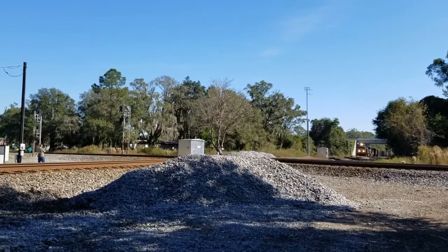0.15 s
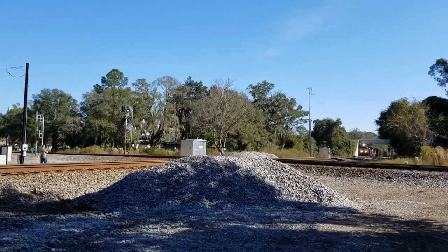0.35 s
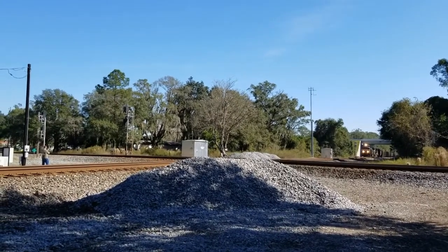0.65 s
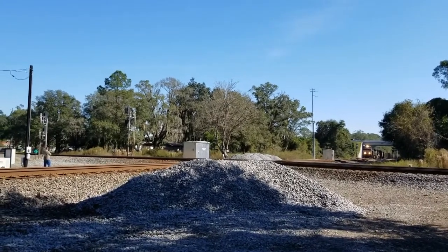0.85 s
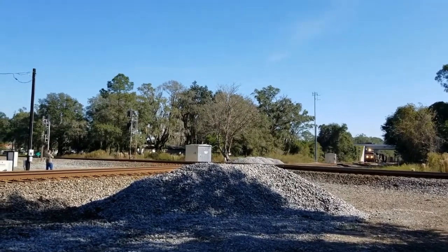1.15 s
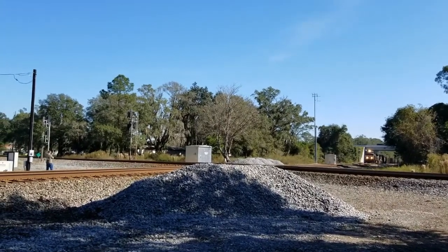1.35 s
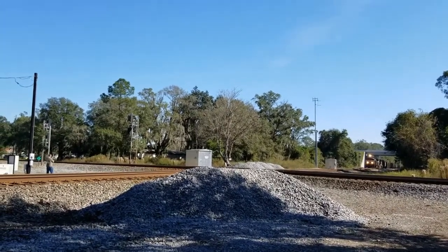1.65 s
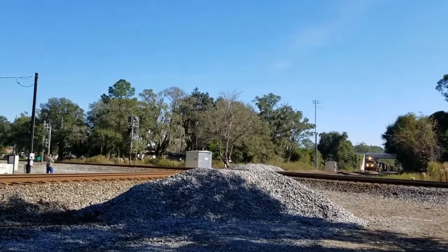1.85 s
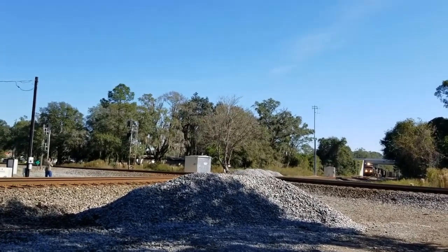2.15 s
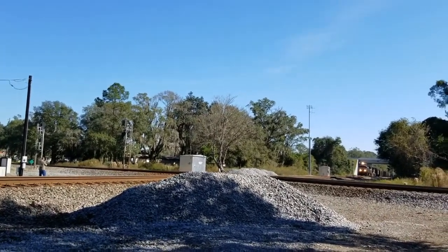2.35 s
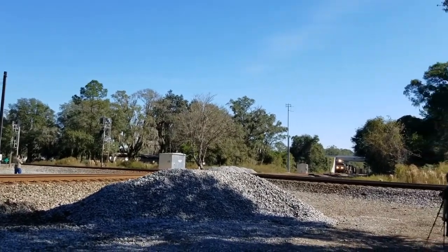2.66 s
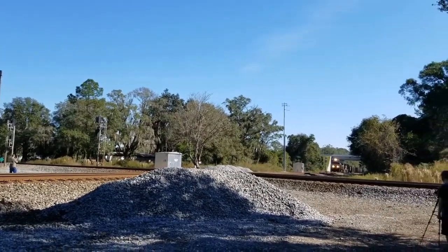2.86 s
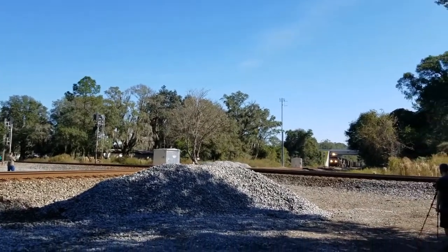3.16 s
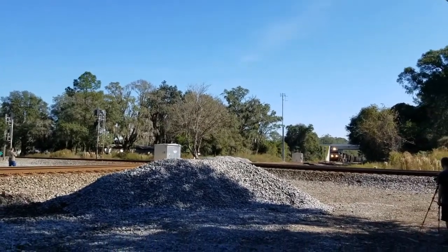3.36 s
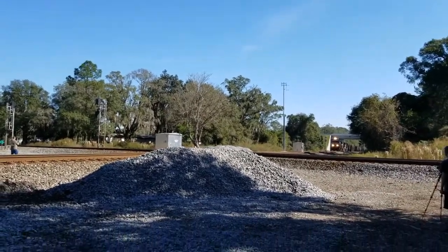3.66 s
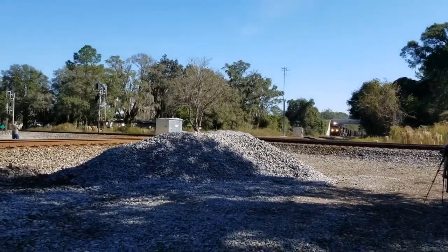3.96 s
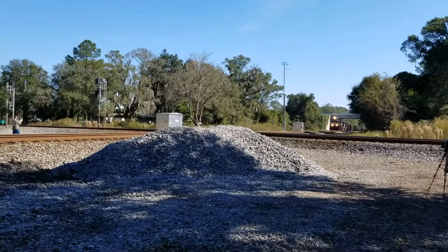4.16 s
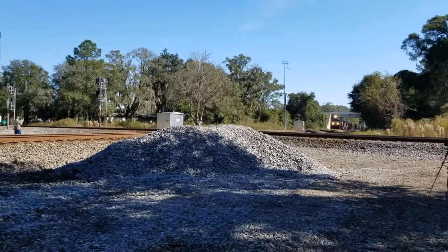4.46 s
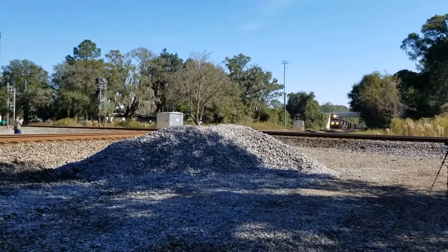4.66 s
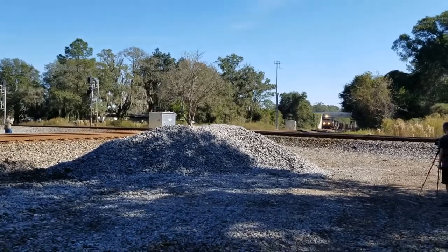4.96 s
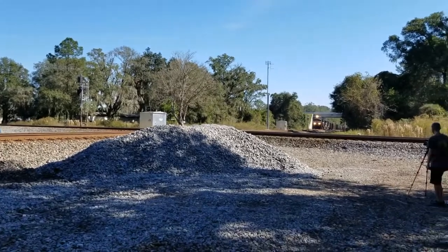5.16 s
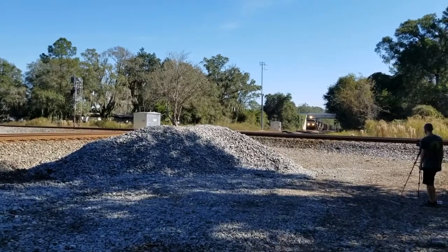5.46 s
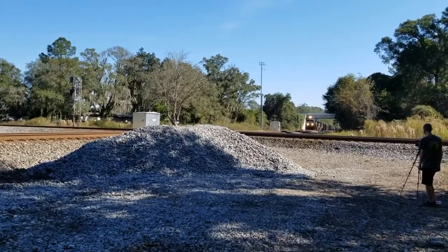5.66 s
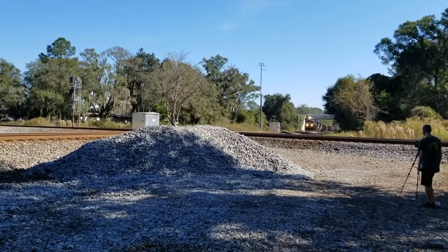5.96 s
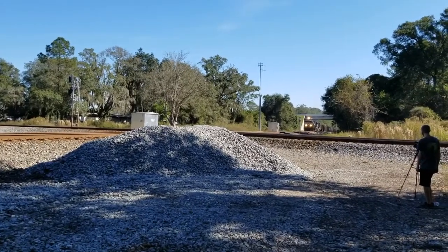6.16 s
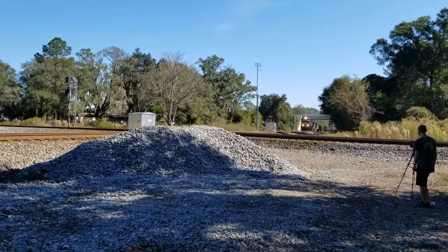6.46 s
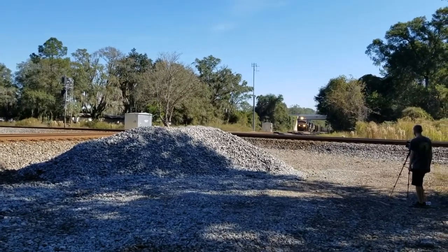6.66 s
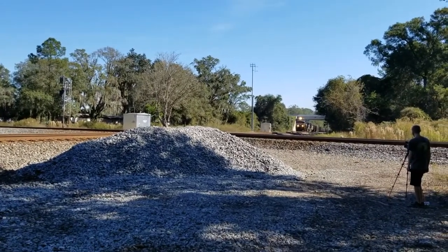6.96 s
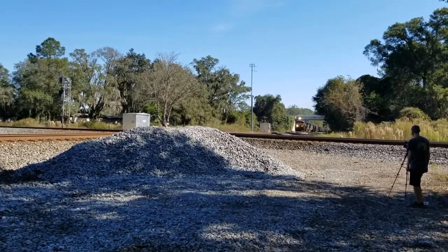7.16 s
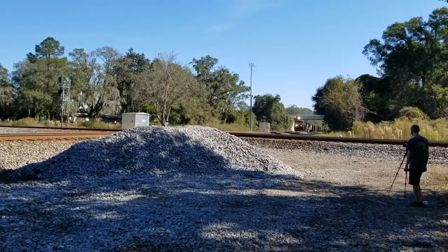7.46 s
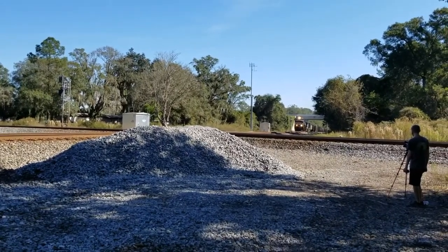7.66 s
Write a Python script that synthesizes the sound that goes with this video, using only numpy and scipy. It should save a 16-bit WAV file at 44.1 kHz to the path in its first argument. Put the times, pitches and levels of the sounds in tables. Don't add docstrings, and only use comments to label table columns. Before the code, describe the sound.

Distant diesel freight train throbs and revs up while gravel crunches close by, air hisses out, then a loud multi-note horn blares to the end.

```python
import sys
import numpy as np
from scipy import signal
from scipy.fft import rfft, irfft, next_fast_len
from scipy.io import wavfile
from scipy.ndimage import uniform_filter1d

SR = 44100
rng = np.random.default_rng(int(sys.argv[2]) if len(sys.argv) > 2 else 0)


def elevation(decibels):
    levels = np.asarray(decibels, float)
    return 10 ** (levels / 20)


def int16_out(signal):
    q = np.round(np.clip(np.atleast_2d(signal).T, -1, 1) * 32767)
    wavfile.write(sys.argv[1], SR, q.astype(np.int16))


N = 344862

# multiple of the crank cycle, level/dB rms
LEAD_ORDERS = [(6, -48.5), (9, -37.5), (10, -53.5), (11, -34.5), (12, -28), (13, -50), (14, -47), (15, -38),
               (17, -54), (18, -54.5), (20, -56.5), (21, -50), (22, -58.5), (23, -58), (24, -44.5),
               (25, -50.5), (26, -55), (27, -54.5), (28, -51.5), (29, -52), (30, -51), (31, -52.5),
               (32, -54), (33, -49.5), (34, -58.5), (36, -55.5)]
# f/Hz, level/dB rms
TRAIL_TONES = [(41.6, -47), (50.1, -45), (91.9, -36), (100.1, -47.5), (107.2, -49.5), (126.3, -58.5),
               (163.9, -52.5)]


def engines():
    idle_cps, full_cps = 5.875, 6.76
    t = np.arange(0, N + 64, 8) / SR
    revs = s_curve(t, mid=4.52, pace=.88)
    cycles = idle_cps + (full_cps - idle_cps) * revs
    load_db = 1.5 - 5.5 * np.exp(-t / 0.39) - 7.5 * revs ** 2
    shut_db, open_db, growth_db_per_s = -17.5, -3.5, 0.94
    bark_db = shut_db + (open_db - shut_db) * s_curve(t, mid=1.6, pace=0.31) + growth_db_per_s * t
    swell_period_s, swell_top_s = 2.6, 0.045
    swell_db = 3 * np.cos(2 * np.pi * (t - swell_top_s) / swell_period_s)
    trail_db = 0.5 - 0.55 * t + swell_db

    crank = np.cumsum(cycles) * t[1]
    turns = [(k * crank, db + load_db + bark_db * (k > 19.5)) for k, db in LEAD_ORDERS]
    turns += [(hz * t, db + trail_db) for hz, db in TRAIL_TONES]
    waver = wander(1.496, t, count=len(turns))
    slip = wander(2.8, t, count=len(turns))
    out = np.zeros(len(t))
    for (turn, db), w, p in zip(turns, waver, slip):
        phase = 2 * np.pi * (turn + rng.random()) + 0.2 * p
        out += elevation(db + 1.85 * w) * np.cos(phase)
    return ports(np.sqrt(2) * signal.resample_poly(out, 8, 1)[:N])


# delay t/s, pitch factor, level/dB
ECHOES = [
    (.2, .9805, -12),
    (.1, .992, -15),
    (.33, .971, -19),
]
# f/Hz, level/dB per Hz
RASP = [(220, -42.5), (330, -26), (430, -36.5), (750, -18.5), (1000, 3), (1300, -20), (2000, -9),
        (3400, -27.5), (4500, -46), (6500, -32.5), (8800, -29), (10500, -38.5), (13000, -60)]


def horn():
    at = round(6.45 * SR)
    t = np.arange(at, N) / SR
    direct = chord(t, shimmer_db=1.91, blur=0.46, bend=1.43)
    echo = np.zeros_like(direct)
    for late, flat, db in ECHOES:
        heard_at = (t - t[0] - late) * flat
        echo += elevation(db) * np.array([np.interp(heard_at, t - t[0], x) for x in direct[::-1]])
    rasp = noise(lambda hz, s: read(RASP, hz) - 46.5 + 0 * s, patchy_db=2.0, size=len(t))
    swell = elevation(pressure_db(t)) * (1 - np.exp(-np.maximum(t - 6.54, 0) / 0.06))
    far = direct + echo
    heard = ports(far + elevation(-11.5) * scatter(far, t60=0.74)) + rasp * swell
    return np.pad(heard, ((0, 0), (at, 0)))


# speaks at t/s, settled f/Hz, share sharp at first, sag share per s, first blare level/dB
CHIMES = [
    (6.528, 271.2, .06, 0.00099, 1.5),
    (6.536, 322.6, .03, .0029, 6),
    (6.532, 376.5, .028, 0.00097, -5),
    (6.54, 485.4, .025, 0.00052, 1.5),
    (6.55, 520.2, .025, 0.00202, -5.5),
]
VOICES = [
    [-26.5, -46.5, -30.5, -30.5, -36.5, -40, -33, -42, -43.5, -41],
    [-35, -31, -34, -39, -40, -38, -48, -49, -56.5, -54.5],
    [-27, -22.5, -45, -38.5, -33.5, -48, -43.5, -64.5, -47, -59.5],
    [-39, -28.5, -40, -38, -42.5, -45.5, -41, -58, -50, -58],
    [-38.5, -41, -36, -41.5, -49.5, -53, -47, -50, -61.5, -55.5],
]


def chord(t, shimmer_db, blur, bend):
    settle_s = .36
    out = np.zeros((2, len(t)))
    for (start, hz, sharp, sag, blare_db), voice in zip(CHIMES, VOICES):
        age = np.maximum(t - start, 0)
        sharpness = sharp * np.exp(-(age * sharp * 100 / settle_s) ** 1.55)
        turns = np.cumsum(hz * (1 + sharpness - sag * (age - .6))) / SR
        blare = blare_db * np.exp(-age / 0.16)
        levels = list(voice) + [voice[-1] - .012 * hz * k for k in range(1, 7)]
        for k, db in enumerate(levels, 1):
            apart = min((k * hz / 2000) ** 1.4, 2.2)
            both, slip, *each = wander(min(4.0 + 18 * apart ** 2, 90), t - t[0], count=4)
            rise_s = 0.011 + 0.001 * k * (hz / 270) ** 3
            rise = (1 - np.exp(-age / rise_s)) ** (1.5 + .4 * k)
            gain = elevation(db + blare + shimmer_db * (both + apart * np.array(each)))
            jitter = blur * apart * (slip + 0.7 * np.array(each[::-1]))
            phase = 2 * np.pi * (k * turns + rng.random()) + jitter
            out += np.sqrt(2) * rise * gain * np.cos(phase)
    out += bend * signal.lfilter(*signal.butter(3, 800, "high", fs=SR), out ** 2)
    return out * elevation(pressure_db(t))


def pressure_db(t):
    age = np.maximum(t - 6.525, 0)
    return 8.5 - 13 * np.exp(-age / 0.01) - 7.5 * np.exp(-age / 0.19)


def scatter(x, t60):
    t = np.arange(SR) / SR
    tail = rng.standard_normal((SR, 2)).T * elevation(-60 * t / t60) * (t > .015)
    return signal.fftconvolve(x, tail / np.linalg.norm(tail[0]), axes=1)[:, :x.shape[1]]


# f/Hz, level/dB per Hz
VENT = [(530, -35.5), (900, -3.5), (1360, -12.5), (1760, 0), (2150, -6.5), (2480, -0.5), (2820, -7.5),
        (4060, -4), (7150, -26.5), (8630, -22), (15000, -50)]


def vent():
    valve_s, rise_s, burst_db, burst_s = 4.775, 0.024, 11.5, 0.23
    leak_db, leak_db_per_s = -59, 3

    def level_db(hz, s):
        age = np.maximum(s - valve_s, 0)
        opened = 20 * np.log10(s_curve(s, valve_s, rise_s) + 1e-3)
        burst = burst_db * np.exp(-age / burst_s)
        return read(VENT, hz) + opened + burst + leak_db + leak_db_per_s * age
    return noise(level_db, patchy_db=0.5)


# start t/s, end t/s, f/Hz, width f/Hz, level/dB rms
WHINES = [(0, 4.7, 7270, 80, -78.5), (2.0, 2.6, 4875, 200, -64), (2.4, 7.0, 8765, 70, -80),
          (4.9, 7.0, 8360, 60, -80), (3.7, 5.2, 1765, 50, -54), (5.24, 5.5, 1820, 8, -41),
          (5.4, 7.0, 1818, 30, -44.5), (5.5, 7.0, 850, 10, -48.5), (4.75, 6.6, 3990, 22, -51.5),
          (4.9, 6.2, 5715, 30, -62), (4.9, 6.4, 5080, 80, -62), (2.7, 3.9, 3200, 250, -56),
          (5.7, 6.5, 1523, 25, -53)]


def whines():
    turbo_hz, spool_hz_per_s, spooled_s = 8765, 325, 4.9
    out = np.zeros((2, N))
    for start, end, hz, width, db in WHINES:
        at, t = span(start, end)
        lag = spool_hz_per_s * np.maximum(spooled_s - t, 0) * (hz == turbo_hz)
        out[:, at:at + len(t)] += elevation(db) * whistle(hz - lag, width, core=1.1)
    return ports(out)


# start t/s, end t/s, f/Hz, width f/Hz, level/dB rms
SQUEALS = [
    (1.27, 1.54, 3812, 12, -49),
    (1.45, 1.98, 3792, 60, -58),
    (1.2, 1.44, 3085, 40, -59),
    (1.2, 1.33, 3800, 30, -58),
]


def squeals():
    chatter_per_s, chatter_top_s = 18, 1.375
    out = np.zeros((2, N))
    for start, end, hz, width, db in SQUEALS:
        at, t = span(start, end)
        chatter = 1 + .75 * np.cos(2 * np.pi * chatter_per_s * (t - chatter_top_s))
        out[:, at:at + len(t)] += elevation(db) * whistle(hz + 0 * t, width, core=3, swing=chatter)
    return ports(out)


def span(start, end):
    return round(start * SR), np.linspace(start, end, round((end - start) * SR))


def whistle(hz, width, core, swing=1):
    size = len(hz)
    r = np.exp(-np.pi * width / SR)
    fuzz = signal.lfilter([1], [1, -2 * r, r * r], rng.standard_normal((4, size)))
    fuzz = fuzz[:2] + 1j * fuzz[2:]
    fuzz = evened(abs(fuzz)) * np.exp(1j * np.angle(fuzz))
    tone = swing * np.exp(2j * np.pi * np.cumsum(hz) / SR)
    return evened(((fuzz + core) * tone).real) * signal.windows.tukey(size, .4)


# t/s, peak level/dB, lowest f/Hz, highest f/Hz
TICKS = [(.4284, -39, 2500, 5500), (.5736, -27, 3000, 7000), (.5736, -36, 12500, 17000),
         (.7736, -36, 11500, 17000), (1.1615, -23, 2000, 3100), (1.1615, -32, 3500, 8500),
         (3.6316, -50, 5000, 13000), (3.7, -48, 7000, 15000), (7.76, -33, 11500, 17000),
         (4.0115, -28, 700, 2600), (1.2325, -26, 600, 2500)]
# t/s, thump level/dB, thump f/Hz, grit level/dB, length t/s
STEPS = [
    (0.242, -30, 420, -46.5, .03),
    (0.683, -31, 605, -40.5, .015),
    (1.231, -25, 400, -43.5, .03),
    (1.527, -16.5, 433, -35, .049),
    (3.45, -31, 1300, -37, .04),
    (4.01, -21.5, 1190, -44, 0.011),
    (4.41, -24, 1090, -52, .017),
]


def gravel():
    out, t = np.zeros((2, N + 8192)), np.arange(4096) / SR
    tick_pan_db = np.array([[2.5], [-2.5]])
    for s, db, lo_hz, hi_hz in TICKS:
        burst = rng.standard_normal((4096, 3)).T * np.exp(-t / 0.00038)
        band = signal.butter(2, [lo_hz, hi_hz], "band", fs=SR)
        burst = signal.lfilter(*band, burst[0] + burst[1:])
        burst = signal.lfilter([1], [1, -.55], burst)
        out[:, round(s * SR):][:, :4096] += elevation(db + tick_pan_db) * burst / abs(burst).max()
    for s, db, hz, grit_db, length in STEPS:
        top_hz = 9000 if hz < 520 else 2300
        thump = elevation(db) * np.exp(-t * hz / 0.98) * np.sin(2 * np.pi * hz * t - 1.2)
        thump = uniform_filter1d(uniform_filter1d(np.roll(thump, 12), size=9), size=9)
        clumps_db = 2.7 * np.repeat(rng.standard_normal(64), 64)
        grains = rng.standard_normal((4096, 2)).T * elevation(clumps_db)
        dull = signal.lfilter([.15], [1, -.85], grains)
        grit = signal.lfilter(*signal.butter(2, top_hz, fs=SR), evened(dull))
        spray = (1 + 1.6 * np.exp(-t / 0.004)) * np.exp(-(t / length) ** 3)
        step = thump + elevation(grit_db) * grit * spray
        out[:, round(s * SR):][:, :4096] += elevation([[1.2], [-1.2]]) * step
    shade = signal.lfilter(*signal.butter(1, [8800, 11500], "bandstop", fs=SR), out[:, :N])
    return 0.5 * shade + 0.43 * out[:, :N]


# f/Hz, level/dB per Hz
ROAR = [(20, -38.5), (45, -10.5), (90, -11), (130, -21), (210, -24.5), (300, -27), (420, -38.5),
        (700, -32.5), (1160, -37), (3080, -41), (4250, -49), (5500, -53), (7000, -66), (10400, -75),
        (16000, -74.5)]


def roar():
    open_s, nearing_db = 3.84, 1.5
    dull_db, bright_db = 0.04, 1.5

    def level_db(hz, s):
        near = np.minimum(s / open_s, 1)
        bright = dull_db + (bright_db - dull_db) * near
        octaves = np.log2(np.maximum(hz, 1000) / 1000)
        return read(ROAR, hz) - 26 + nearing_db * near + bright * octaves
    return noise(level_db, patchy_db=1.54)


def rustle():
    t = np.arange(N) / SR
    high = signal.butter(2, 11500, "high", fs=SR, output="sos")
    fizz = signal.sosfilt(high, rng.standard_normal((N, 2)).T)
    moving_db = 15 * s_curve(-t, -1.9, .3) + 12 * s_curve(t, 7.66, .06)
    return elevation(-79.5 + moving_db + 2.5 * wander(5.0, t, count=1)) * fizz


# f/Hz, width f/Hz, level/dB
RIDGES = [(740, 430, 1), (1825, 685, 6), (3380, 550, 3), (4900, 800, 4), (7300, 260, 1.5), (4540, 240, -2)]
# f/Hz, likeness 0..1
SAME = [(100, .98), (200, .97), (500, .8), (860, .76), (1250, .45), (1800, .45), (2300, .2), (3400, .5),
        (5000, .4), (6500, .15), (9000, .05)]


def noise(level_db, patchy_db, size=N):
    frames, hz = size // 256 + 5, np.fft.rfftfreq(1024, 1 / SR)
    a, b, c, d, patches = rng.standard_normal((frames, 513, 5)).T
    patches = uniform_filter1d(uniform_filter1d(patches, size=7, axis=0), size=40, axis=1)
    ridges = sum(db / (1 + (2 * (hz - f) / w) ** 2) for f, w, db in RIDGES)
    same = np.clip(read(SAME, hz), 0, 1)[:, None]
    left = a + 1j * b
    right = same * left + np.sqrt(1 - same ** 2) * (c + 1j * d)
    shape_db = level_db(hz[:, None], np.arange(frames) * 256 / SR) + ridges[:, None]
    z = np.array([left, right]) * elevation(shape_db + patchy_db * evened(patches))
    return ports(signal.istft(z, nperseg=1024, noverlap=768)[1][:, :size])


# f/Hz, radians the left leads
LEADS = [(60, -.07), (200, -.12), (520, -.2), (860, -.3), (1200, -.7), (1550, -2.3), (1900, -2.3),
         (2400, -.8), (3600, -1.5), (6000, -1)]
# f/Hz, left over right level/dB
LOUDER = [(150, .6), (350, .8), (520, 2), (860, 2.4), (1300, 3.5), (1550, 4), (1900, 1), (2600, -3),
          (3000, -4), (3400, 2), (7200, 2), (8300, -7), (9500, -5), (11000, 0)]


def ports(x):
    size = next_fast_len(x.shape[-1] + 8192)
    hz = np.fft.rfftfreq(size, 1 / SR)
    tilt = elevation(read(LOUDER, hz) / 2) * np.exp(.5j * read(LEADS, hz))
    return irfft(rfft(x, size) * np.array([tilt, 1 / tilt]), size)[:, :x.shape[-1]]


def evened(x):
    return x / np.sqrt(np.mean(x ** 2) + 1e-20)


def read(points, hz):
    f, value = np.transpose(points)
    return np.interp(np.log(hz + 1), np.log(f + 1), value)


def wander(hz, t, count):
    knots = uniform_filter1d(rng.standard_normal((count, 400)), size=3, axis=1) * np.sqrt(3)
    return np.array([np.interp(t * 3 * hz, np.arange(400), k) for k in knots])


def s_curve(t, mid, pace):
    return 1 / (1 + np.exp((mid - t) / pace))


def scene():
    return engines() + horn() + vent() + whines() + squeals() + gravel() + roar() + rustle()


def roll_off(x):
    return signal.sosfilt(signal.butter(12, 16490, fs=SR, output="sos"), x)


def record(dry):
    miked = signal.sosfilt(signal.butter(3, 38, "high", fs=SR, output="sos"), dry)
    power = abs(uniform_filter1d((miked ** 2).mean(0), size=4096))
    power_db = 10 * np.log10(power + 1e-12)
    over_db = 0.69 * np.maximum(power_db + 19, 0)
    r = np.exp(-1 / (.2 * SR))
    ducked = miked / elevation(signal.lfilter([1 - r], [1, -r], over_db))
    soft = 1.1 * np.tanh(ducked / 1.1)
    edge = signal.firwin(801, 15800, window=("kaiser", 7), fs=SR)
    held = np.pad(soft, ((0, 0), (400, 400)), "reflect")
    limited = signal.oaconvolve(held, edge[None], "valid")
    fade = np.minimum(np.arange(N, 0, -1) / 128, 1)
    return roll_off(limited * fade)


dry = scene()
out = record(dry)
int16_out(out)
```